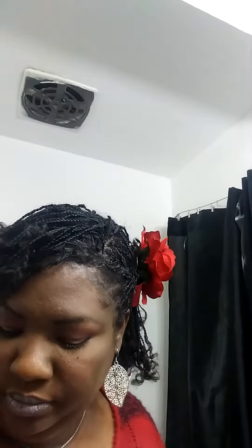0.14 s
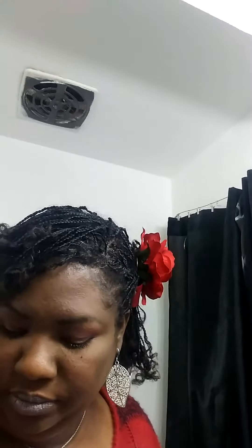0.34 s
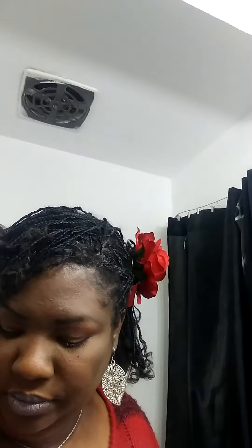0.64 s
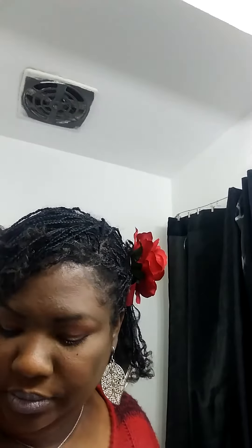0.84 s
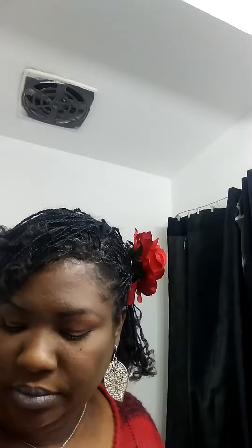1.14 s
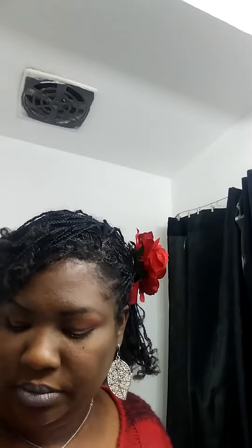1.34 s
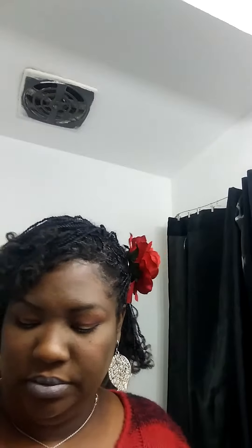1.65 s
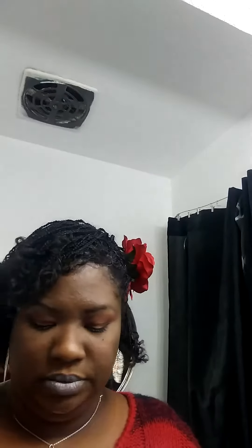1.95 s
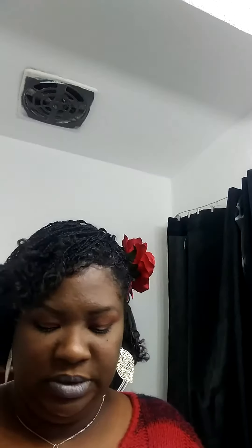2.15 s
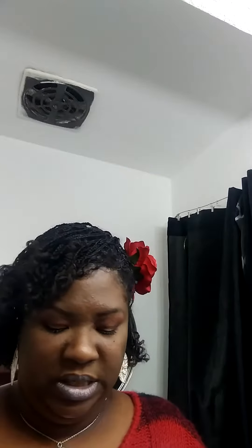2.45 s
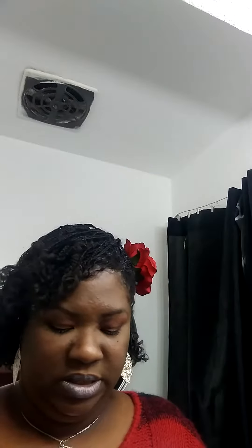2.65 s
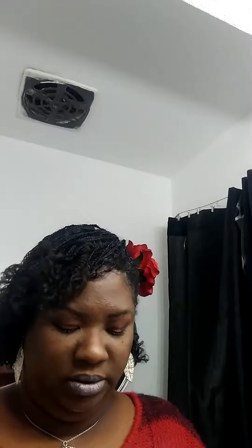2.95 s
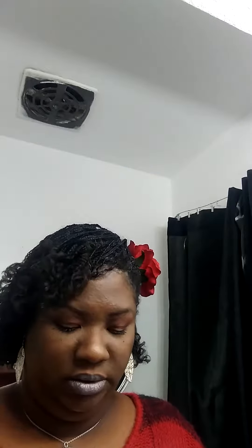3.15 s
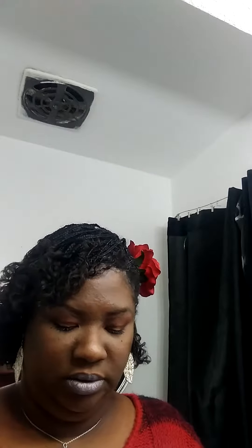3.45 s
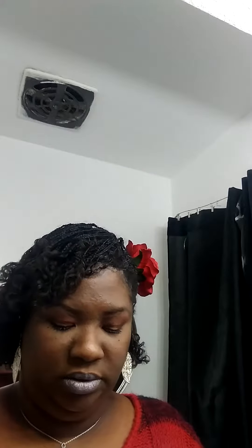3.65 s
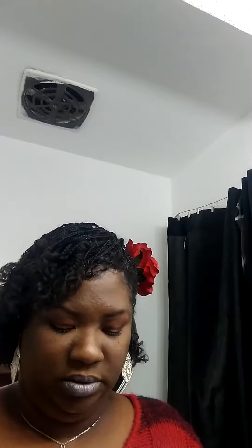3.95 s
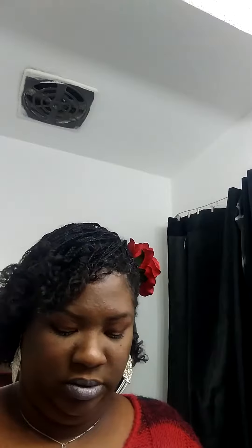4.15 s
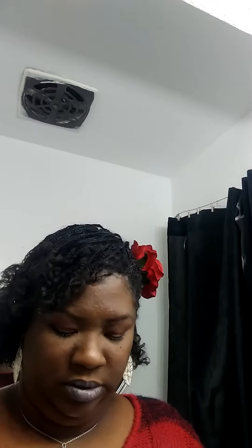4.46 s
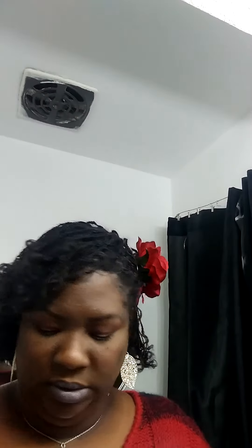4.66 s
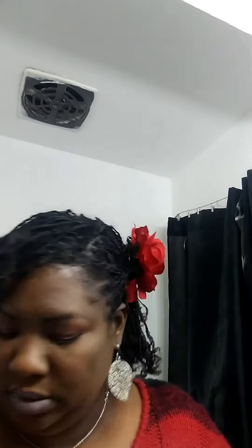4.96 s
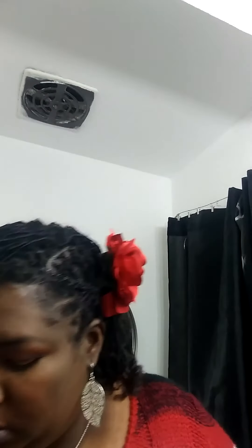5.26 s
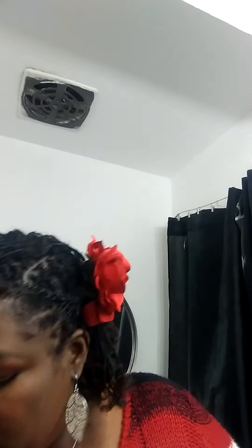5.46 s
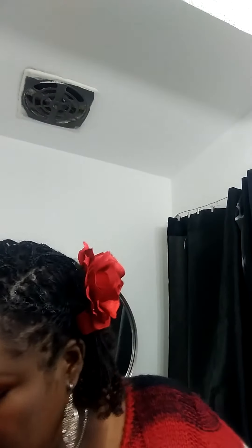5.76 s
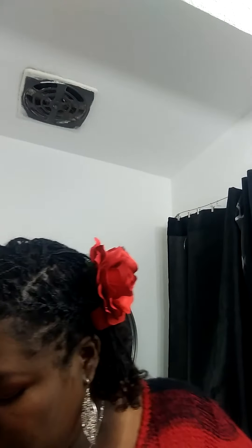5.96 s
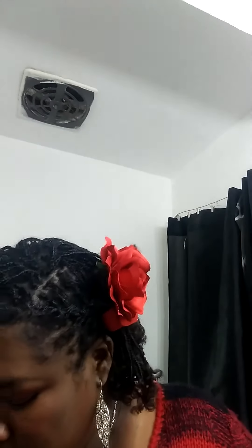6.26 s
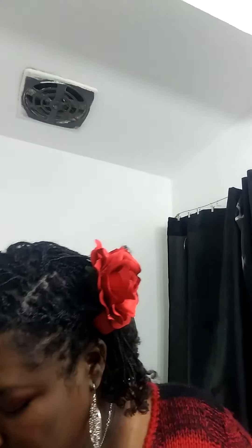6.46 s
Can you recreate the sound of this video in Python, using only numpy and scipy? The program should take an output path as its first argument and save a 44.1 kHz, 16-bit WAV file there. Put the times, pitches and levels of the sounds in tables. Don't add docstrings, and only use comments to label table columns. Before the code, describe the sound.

Very close to the microphone, a pouch rustles and crackles with small ticks and hollow knocks for about a second and a half. Sparse plastic taps follow, with a hard clack as a case is set down, then another sharp cluster later. Near the end the stand is bumped and slides with low rumbles and plastic scrapes. Faint air hiss in a small hard room.

```python
import sys
import numpy as np
from scipy import signal
from scipy.fft import rfft, irfft
from scipy.io import wavfile
from scipy.ndimage import uniform_filter1d, minimum_filter1d

SR = 44100
rng = np.random.default_rng(int(sys.argv[2]) if len(sys.argv) > 2 else 0)


def master(y):
    cut = np.clip(np.atleast_2d(y).T, -1, 1)
    pcm = np.round(cut * 32767)
    wavfile.write(sys.argv[1], SR, pcm.astype(np.int16))


def elevation(decibels):
    levels = np.asarray(decibels, float)
    return 10 ** (levels / 20)


N = 291677

# (top [s], rise per 20 dB [s], fall per 20 dB [s], fizz [dB], heft [dB])
POUCH = [(0.153, 0.32, 0.24, -29.5, -13), (0.265, 0.7, 0.1, -34.5, -14.5), (0.37, 0.23, 0.36, -34.5, -15),
         (.45, 0.23, 0.2, -33, -11), (0.527, 0.2, 0.08, -31.5, -8.5), (0.738, 0.5, 0.18, -37.5, -12.5),
         (0.923, 0.33, 0.17, -32, -11), (0.999, 0.13, 0.01, -34.5, -7.5), (1.035, 0.23, 0.01, -35.5, -7.5),
         (1.128, 0.4, 0.1359, -36.5, -9.5), (1.25, 0.35, 0.2, -39, -15.5), (1.32, 0.1, 0.05, -39, -11),
         (1.398, 1.2, 0, -42.5, -12.5), (1.54, 0.4, 0.5, -49, -13.5)]
# (top [s], rise per 20 dB [s], fall per 20 dB [s], fizz [dB], heft [dB])
DRAGS = [
    (5.358, 0.02, 0.077, -40, -6),
    (5.382, .05, 0.081, -45, -6.5),
    (6.25, 0.054, 0.046, -37, -6),
    (5.736, 0.013, 0.091, -51.5, 5),
    (6.038, 0.12, 0.062, -40.5, -1),
    (6.12, 0.16, 0.04, -56.5, 0),
    (6.179, 0.007, 0.12, -37.5, 3),
    (6.204, 0.038, 0.076, -35, -0.5),
    (6.323, 0.019, 0.099, -46, -21),
    (6.505, 0.003, 0.077, -55, -1.5),
]
# (middle [s], half length [s], fizz [dB], heft [dB])
SWIPES = [(2.542, 0.0097, -49, -3.5), (3.083, 0.016, -50, -12), (3.285, 0.031, -45.5, -12.5),
          (3.608, 0.022, -46, -18.5), (3.933, 0.023, -44.5, -14), (4.001, 0.007, -54.5, -13),
          (4.39, 0.17, -61.5, 1), (4.587, 0.016, -51.5, -9.5), (4.776, 0.019, -53, 0.5),
          (5.137, 0.015, -51, -26), (5.443, 0.034, -64, -1.5), (5.634, 0.034, -70.5, 10),
          (5.903, 0.032, -49.5, 3.5)]
# (time [s], fizz [dB])
FIDGET = [(1.49, -77), (1.62, -57), (1.75, -70), (1.93, -66), (2.1, -51.5), (2.33, -51.5), (2.48, -64),
          (2.72, -55.5), (3.0, -67.5), (3.2, -68.5), (3.56, -60), (3.99, -53.5), (4.14, -74), (4.55, -67),
          (4.63, -46.5), (5.02, -57), (5.5, -65.5), (6.62, -67)]
FIDGET_DB = [0, -71, -72.5]
FIDGET_LEAN = [1, 0.58, 0.65]
BODY_DB, BODY_LEAN = -3.5, 1.606

# (frequency [Hz], density [dB per Hz])
FIZZ = [(2650, -52), (4500, -20), (4850, -13), (5760, -15.5), (6730, -7), (7820, -3), (9140, -2),
        (10800, 3), (15000, -4.5), (16200, -21.5)]
SCRAPE = [(650, -15.5), (1100, -15), (1220, -5.5), (1720, -2.5), (1880, -2), (5590, 1.5), (7000, -4),
          (9100, -33), (15400, -120)]
BODY = [(110, -17), (180, -7.5), (383, -3.5), (446, -5), (867, -2.5), (978, -4.5), (2000, -10),
        (2600, -9.5), (4400, -120)]

# (frequency [Hz], density [dB per Hz])
HUSH = [(18, -30), (30, 3.5), (86, -2), (554, -15.5), (721, -9.5), (1220, -21.5), (1810, -16), (3770, -17),
        (4190, -8), (4530, -13.5), (7270, -20), (11100, -8), (13700, -12), (16000, -22)]
HUSH_DB = -61.5
# (frequency [Hz], width [Hz], level [dB])
PIPES = [
    (746, 430, -81),
    (1560, 90, -78),
    (2280, 90, -82.5),
]

# (time [s], snap [dB], shell against snap [dB], room answer [dB])
TICKS = [(.0085, -28, -18, -30), (.128, -28, -23, -19), (.265, -25.5, -25, -24), (.353, -26.5, -14, -22),
         (.4394, -35, -20, -17), (.5053, -30, -29, -20), (.711, -39, -22, -29), (0.867, -27, -37, -27),
         (.928, -23, -22, -16), (1.1254, -27, -24, -27), (1.2474, -31.5, -27, -9), (1.314, -33, -19, -10),
         (1.368, -36, -25, -23), (1.3955, -32.5, -25, -20), (1.4316, -46, -25, -25),
         (1.4499, -40, -20.5, -10), (1.5906, -42, -15.5, -9), (1.7065, -46, -17, -12),
         (1.818, -47.5, -30.5, -9), (1.8597, -47, -32, -5.5), (1.9255, -57, -28, -16),
         (2.3507, -28, -15, -28), (3.38, -53, -15, -29), (3.6985, -42, -37, -19),
         (3.917, -34.5, -25.5, -14), (4.242, -43, -26, -18), (5.871, -41, -14, -14),
         (6.117, -44.5, -26, -3)]
CAPS = [(1.52, -46, -19, -0.5), (1.669, -43.5, -17, -10), (1.7678, -43.5, -20, -6.5),
        (2.178, -30, -10.5, -12), (2.1849, -39, 1, -23), (2.357, -37, -28, -22), (2.36, -32, -13, -21),
        (2.3765, -4.5, -12, -21.5), (2.5365, -33, -23, -11.5), (2.833, -22.5, -16.5, -21),
        (3.343, -45, -24, -6), (3.5094, -32, -47, -16), (3.5185, -33, -51, -17), (3.5184, -20.5, -52, -20),
        (4.0166, -35.5, -37, -26), (4.043, -38.5, -13.5, -10), (4.0932, -19.5, -26.5, -16),
        (4.154, -6.5, -29.5, -19.5), (4.4477, -11.5, -14.5, -21), (4.453, -6, -16.5, -21),
        (4.5697, -36, -29.5, -12), (4.6057, -28, -20, -10.5), (4.6505, -18.5, -19, -19.5),
        (5.043, -33.5, -43, -13), (5.1967, -32.5, -27, -18), (5.3536, -34.5, -12.5, -7.5)]
CASES = [(1.639, -42.5, -20, -19), (2.0118, -39.5, -14.5, -11), (2.3017, -30.5, -16.5, -15),
         (2.349, -27, -5.5, -19.5), (2.374, -3.5, -15.5, -16), (2.3753, -8, -14.5, -20),
         (2.8847, -36.5, -12.5, -14), (2.9174, -42, -9.5, -11), (3.1966, -45.5, -17, -12.5),
         (3.3662, -33, -11.5, -16.5), (4.0495, -31.5, -12, -30), (4.2175, -35.5, -6.5, -17.5),
         (4.226, -35, -34, -12), (4.2938, -12.5, -28, -20), (4.3276, -34.5, -12, -13.5),
         (4.4565, -10.5, -17.5, -22), (4.7203, -18, -17.5, -18), (4.744, -19, -27, -16),
         (5.0879, -30, -15, -12.5), (6.1975, -27.5, -8, -3.5)]
TUBES = [(1.954, -33, -16.5, -14), (2.134, -41.5, -17, -16), (2.244, -34.5, -13, -8),
         (2.502, -42.5, -39, -5.5), (2.5911, -34.5, -16.5, -16.5), (2.6237, -36, -23.5, -13),
         (2.718, -42, -12, -17), (2.801, -43, -19.5, -13), (3.0058, -39, -13.5, -13.5),
         (3.013, -39.5, -10, -24), (3.4545, -44, -27.5, -4), (3.6814, -33, -38, -22),
         (3.6935, -31.5, -44, -24), (3.819, -32.5, -47.5, -13), (3.8293, -32.5, -18, -22),
         (3.874, -37.5, -16.5, -13), (4.263, -40, -28, -9.5), (4.499, -40.5, -0.5, -17.5),
         (4.6578, -22.5, -22, -16), (4.715, -33.5, -16, -25), (4.8274, -41, -18, -5.5),
         (5.7241, -50, 0, -5.5), (6.1757, -39, -5, -24.5), (6.3163, -40, -23, -8), (6.327, -35, -22, -12),
         (6.5035, -33.5, -28, -20)]
# (shell ring [Hz], thud under the shell [dB])
SHELLS = [
    (6530, -20),
    (2400, -5.5),
    (1700, -17.5),
    (4530, -23.5),
]
SNAP_EDGE = [5.5, 3.5, 2.5]

# (time [s], peak [dB], pitch [Hz], T60 [s])
THUDS = [(.432, -34, 150, 0.16), (.438, -39, 290, 0.11), (.438, -33.5, 606, 0.11), (.44, -39, 386.4, 0.37),
         (.52, -42.5, 170, .12), (.818, -36, 567, .09), (.84, -44, 92, 0.18), (.992, -37, 225, 0.11),
         (1.062, -38.5, 250, .1), (1.175, -41, 245, .1), (1.955, -44.5, 298, .08),
         (2.372, -32.5, 189, 0.094), (2.378, -23, 1618, .13), (2.378, -23.5, 2370, 0.1),
         (2.378, -32, 2760, .07), (2.63, -53, 750, .12), (2.92, -48, 640, .1), (3.19, -51, 518, 0.12),
         (3.37, -46, 1650, 0.086), (4.447, -46, 205, 0.11), (5.283, -43.5, 108, 0.28),
         (5.61, -45, 90.3, .3), (5.675, -33, 75, .3), (5.72, -32, 93, .25), (5.834, -25.5, 80, 0.26),
         (5.88, -25.5, 69.7, 0.26), (5.925, -30.5, 110, 0.23), (5.975, -30, 72, 0.28),
         (5.84, -33.5, 249.6, .3), (5.88, -32, 229, 0.26), (5.86, -34, 347, 0.31), (6.035, -31.5, 92, 0.28),
         (6.075, -34.5, 84.2, .25), (6.172, -29.5, 125, 0.14), (6.192, -29.5, 105, 0.18),
         (6.18, -29, 253.5, 0.32), (6.175, -33, 427, .2), (1.3, -51.5, 850, 0.14), (1.41, -54, 1290, 0.099),
         (3.05, -53, 327, 0.31), (4.78, -48, 1600, .15), (1.771, -61, 1625, 0.19)]
# (time [s], peak [dB], pitch [Hz], T60 [s], scuff [dB])
KNOCKS = [(0.436, -28, 891, 0.14, -28.5), (0.516, -41, 387, 0.17, -38.5), (0.706, -43, 611, 0.31, -48),
          (0.816, -32, 876, 0.092, -37.5), (0.989, -36, 650, 0.1, -36), (1.038, -33.5, 648, 0.12, -40.5),
          (1.128, -33, 1730, 0.14, -35.5), (1.145, -37, 2160, 0.13, -39), (1.155, -40, 626, 0.23, -46),
          (1.189, -35, 521, 0.12, -66), (2.377, -25, 1502, 0.22, -43.5), (3.315, -36, 615, 0.073, -49.5),
          (3.582, -43.5, 695, 0.07, -61.5), (3.615, -51.5, 835, 0.13, -56), (4.827, -44, 630, 0.09, -66),
          (5.11, -43, 1700, 0.073, -46), (5.43, -54.5, 830, 0.24, -63), (6.335, -46, 610, 0.14, -66),
          (6.005, -27, 359, 0.19, -39.5), (6.172, -23.5, 616, 0.19, -47), (6.175, -28, 944, 0.16, -53),
          (3.828, -43, 1005, 0.053, -50), (3.876, -43, 854, 0.095, -58), (3.93, -51, 844, 0.082, -60),
          (4.66, -41, 894, 0.1, -55), (4.72, -41, 942, 0.12, -58), (3.006, -41, 1100, 0.049, -58),
          (4.155, -44, 894, 0.081, -53), (2.252, -45, 558, 0.12, -44), (1.06, -36.5, 618, 0.075, -45)]
KNOCK_SPREAD, KNOCK_SIDE_DB = 0.07, -2
THUMP_DB = -1.5

# (top [s], rise per 20 dB [s], fall per 20 dB [s], rumble [dB])
JOLTS = [(0.44, 0.3, 0.5, -56.5), (0.85, -0.3, 0.7, -58), (0.99, 0.5, 0.8, -58.5), (1.35, 2, -0.5, -64),
         (1.8, 0.5, -3, -64), (2.37, -1.5, -0.5, -59), (2.95, -4, 1.5, -63), (4.46, 5, 5, -71),
         (5.3, 0.4, 1, -55), (5.735, 0.12, 0.53, -41), (5.85, 0, -0.2, -34), (6.04, 0.21, -0.28, -35),
         (6.19, -0.06, -0.13, -31), (6.42, -2, 2.5, -62.5)]
STAND_DB = -69
# (frequency [Hz], density [dB per Hz])
RUMBLE = [(21, -31.5), (38, 4), (65, 2.5), (95, -0.5), (155, -4), (193, -9), (264, -12), (346, -16),
          (475, -17.5), (680, -28.5), (1140, -120)]
# (top [s], rise per 20 dB [s], fall per 20 dB [s], level [dB])
SHOVES = [
    (5.845, 0.11, 0.8, -41.5),
    (5.91, 0.2, 0.54, -43),
    (6.02, 0.2242, 0.17, -33.5),
    (6.18, 0.02, 0.29, -37),
    (5.72, 0.34, 3, -62),
]
# (frequency [Hz], width [Hz], level [dB])
PLATE = [
    (72, 25, -0.5),
    (254.5, 60, -4.5),
    (360, 55, -7),
    (605, 230, -26),
]

# (frequency [Hz], left-right coherence [0-1])
SAME = [(60, .97), (200, .93), (350, .85), (600, .3), (900, .1), (15000, .0)]
BASS_TURN = 2.85
# (frequency [Hz], left over right [dB])
LEFT_BRIGHTER = [(60, -2.5), (240, 0.5), (950, 5.5), (3800, 3.5), (6000, 12), (8000, 13.5), (11000, 26),
                 (13000, 14), (15500, 18.5)]

# (frequency [Hz], against the local band [dB], against the
# loudest band [dB])
LOSS = [(500, -22, -60), (1400, -12, -50), (2600, -1, -28), (8000, 0, -25), (9500, -9, -36),
        (11500, -11, -36), (14000, -6, -36), (15500, -3, -30)]
STARVED_HZ = [2000, 2850, 3850, 4600, 5400, 6300, 7150, 7750]
EDGE_HZ, GRID = 15800, 401
TOP_DB, TOP_DB_PER_KHZ = -33, 5
BURIED_DB = -54


def read(points, hz):
    f, value = np.transpose(points)
    return np.interp(np.log(hz + 1), np.log(f + 1), value)


def add(mix, s, sound):
    part = mix[..., round(s * SR):][..., :sound.shape[-1]]
    part += sound[..., :part.shape[-1]]


def taps_of(points, size=16384):
    gain_db = read(points, abs(np.fft.fftfreq(size, 1 / SR)))
    log_gain = np.log(elevation(np.maximum(gain_db, -70)))
    return np.fft.ifft(np.exp(np.conj(signal.hilbert(log_gain)))).real[:size // 2]


def coloured(x, points):
    taps = taps_of(points)
    return signal.oaconvolve(x, taps[None] / np.linalg.norm(taps), axes=1)[:, :N]


def resonate(x, hz, q):
    return signal.lfilter(*signal.iirpeak(hz, q, fs=SR), x)


def flicker(size, db):
    wander = uniform_filter1d(uniform_filter1d(rng.standard_normal(N), size), size)
    gain = elevation(db * wander / wander.std())
    return gain / np.sqrt(np.mean(gain ** 2))


def coarse_times():
    return np.arange(N // 32 + 1) * 32 / SR


def spread_out(gain):
    return np.interp(np.arange(N) / 32, np.arange(len(gain)), gain)


def strokes(rows):
    top, rise, fall, db = np.transpose(rows)[:4, :, None]
    late = coarse_times() - top
    return elevation(db - 20 * np.maximum(late / abs(fall), -late / abs(rise)))


def rub_gains():
    t = coarse_times()
    middle, half, db, _ = np.transpose(SWIPES)[..., None]
    swipes = elevation(db) * np.exp(-((t - middle) / half) ** 2 / 2)
    shapes = np.vstack([strokes(POUCH + DRAGS), swipes])
    heft_db = np.array([row[-1] for row in POUCH + DRAGS + SWIPES])
    band_db = np.array([0 * heft_db, heft_db, BODY_DB + BODY_LEAN * heft_db])
    power = elevation(2 * band_db) @ shapes ** 2
    fidget_db = np.interp(t, *np.transpose(FIDGET))
    gains = []
    for k, (level_db, lean) in enumerate(zip(FIDGET_DB, FIDGET_LEAN)):
        above_db = fidget_db + 60 * (k > 0)
        bed = elevation(level_db + lean * above_db)
        gains.append(spread_out(np.sqrt(power[k] + bed ** 2)))
    return np.array(gains)


def rubbing():
    gains = rub_gains()
    slips = np.array([flicker(size=600, db=1.3) * flicker(size=30, db=1.7) for band in gains])
    crackle = elevation(4.0 * np.minimum(rng.exponential(1, N), 3))
    crackle = crackle * (rng.random(N) < 350 / SR)
    grain = rng.standard_normal((3, 2, N)) + 1.1 * crackle * rng.standard_normal((2, N))
    band_gain = elevation(np.array([6, 4, 4]))[:, None]
    return (gains * slips * band_gain)[:, None] * grain


def hush():
    air = rng.standard_normal((2, N))
    bands = sum(elevation(db) * np.sqrt(SR / width) * resonate(air, hz, hz / width) for hz, width, db in PIPES)
    steady = elevation(HUSH_DB) * coloured(air, HUSH) * flicker(size=6000, db=1.5)
    return steady + bands * flicker(size=3000, db=5.0)


def contacts():
    events = []
    for rows, (hz, thud_db) in zip([CAPS, TUBES, CASES, TICKS], SHELLS):
        for s, snap_db, heft_db, room_db in rows:
            shell_db = snap_db + heft_db
            events.append((s, snap_db, shell_db, shell_db + thud_db, room_db, hz))
    return events


def clicks():
    t, drive = np.arange(7000) / SR, np.zeros((3, 2, N))
    contact_t60 = np.array([0.003, 0.008, 0.011])[:, None, None]
    room_t60 = np.array([0.16, 0.19, 0.21])[:, None, None]
    band_db, wet_db = np.array([2, 12, 10]), np.array([4, 6, 8])[:, None, None]
    far = elevation([[0], [-3]])
    for s, snap_db, shell_db, thud_db, room_db, hz in contacts():
        noise, echoes = rng.standard_normal((3, 2, len(t))), rng.standard_normal((2, len(t)))
        peaks = np.clip(uniform_filter1d(echoes, size=9) * 3, -2, 2) - 0.11
        sparse = elevation(5 * np.exp(-t / 0.061) * peaks)
        onset = 1 - np.exp(-t / 0.00043)
        tail = elevation(room_db + wet_db - 60 * t / room_t60) * onset * sparse
        sound = (elevation(-60 * t / contact_t60) * far + tail) * noise
        sound[0][:, [0, 4, 30]] += far * SNAP_EDGE
        sound[0] = 0.48 * sound[0] + 1.005 * resonate(sound[0], 11300, 5.0)
        own_hz = hz * elevation(1.5 * echoes[0, 0])
        sound[1] = 0.5 * sound[1] + 0.73 * resonate(sound[1], own_hz, 7.0)
        level = elevation(np.array([snap_db, shell_db, thud_db]) + band_db)[:, None, None]
        add(drive, s + 0.0004, level * sound)
    return drive


def knocks():
    t, out = np.arange(12000) / SR, np.zeros((2, N))
    main = (np.arange(7) == 0)[:, None]
    weight = np.where(main, 1, elevation(KNOCK_SIDE_DB) / 2)
    for s, peak_db, hz, t60, *_ in KNOCKS + THUDS:
        spread, phase = rng.standard_normal((2, 2, 7, 1))
        mode_hz = hz * (1 + KNOCK_SPREAD * spread * ~main)
        ring = (weight * np.sin(2 * np.pi * (mode_hz * t + phase))).sum(1)
        rattle = 1 + 0.35 * uniform_filter1d(rng.standard_normal(len(t)), size=400) * 20
        decay = elevation(peak_db - 2.5 - 60 * t / max(t60, 0.01))
        add(out, s, decay * rattle * (1 - np.exp(-t * hz / 0.6)) * ring)
    return out


def scuffs():
    t, drive = np.arange(12000) / SR, np.zeros((3, 2, N))
    for s, _, _, t60, scuff_db in KNOCKS:
        shape = elevation(1.5 - 60 * t / max(1.15 * t60, 0.01)) * (1 - np.exp(-t / 0.0022))
        level = elevation([scuff_db, scuff_db + THUMP_DB])[:, None, None]
        add(drive[1:], s, level * shape * rng.standard_normal((2, 2, len(t))))
    return drive


def stand():
    shake = spread_out(np.sqrt((strokes(JOLTS) ** 2).sum(0) + elevation(2 * STAND_DB)))
    push = elevation(6.0) * shake * flicker(size=900, db=1.5)
    slide = spread_out(np.sqrt((strokes(SHOVES) ** 2).sum(0))) * rng.standard_normal((2, N))
    drum = sum(elevation(db) * np.sqrt(SR / width / 3) * resonate(slide, hz, hz / width) for hz, width, db in PLATE)
    return coloured(push * rng.standard_normal((2, N)), RUMBLE) + drum


def scene():
    fizz, scrape, body = rubbing() + clicks() + scuffs()
    plastic = coloured(fizz, FIZZ) + coloured(scrape, SCRAPE) + coloured(body, BODY)
    return plastic + hush() + knocks() + stand()


def framed(x, size):
    n, k, grid = np.arange(2 * size) + 0.5, np.arange(size) + 0.5, GRID % size
    window = np.sin(np.pi * n / (2 * size))[:, None]
    basis = np.sqrt(2 / size) * window * np.cos(np.pi / size * np.outer(n + size / 2, k))
    padded = np.pad(x, ((0, 0), (size - grid, 2 * size - (N - grid) % size))).reshape(2, -1, size)
    return np.concatenate([padded[:, :-1], padded[:, 1:]], axis=2), basis, k * SR / (2 * size)


def lapped(back):
    size = back.shape[2] // 2
    first = np.pad(back[..., :size], ((0, 0), (0, 1), (0, 0)))
    second = np.pad(back[..., size:], ((0, 0), (1, 0), (0, 0)))
    return (first + second).reshape(2, -1)[:, size - GRID % size:][:, :N]


def clipped_short(x, snappy, size=128):
    frames, basis, hz = framed(x, size)
    lines = frames @ basis
    snappy = np.repeat(snappy.any(0, keepdims=True), 8, axis=1)[:, 3:][:, :lines.shape[1]]
    band = uniform_filter1d(uniform_filter1d(lines ** 2, size=5), size=2, axis=1)
    loudest = band[..., hz > 1500].max((0, 2), keepdims=True)
    snap = -minimum_filter1d(-loudest, size=9, axis=1)
    loss_hz, _, loss_db = np.transpose(LOSS)
    under_db = np.interp(hz, loss_hz, loss_db)
    luck = uniform_filter1d(rng.standard_normal(band[:1].shape), size=6)
    luck = uniform_filter1d(luck, size=3, axis=1) * np.sqrt(18)
    band = band * elevation(2 * 6 * luck)
    under_loudest = band < elevation(2 * under_db - 1) * loudest
    under_snap = (band < elevation(2 * BURIED_DB) * snap) & (hz > 1500)
    return lapped((lines * ~((under_loudest | under_snap) & snappy)) @ basis.T)


def patchy(x, size=1024):
    frames, basis, hz = framed(x, size)
    lines = frames @ basis
    loss_hz, *loss_db = np.transpose(LOSS)
    dead_db, under_db = (np.interp(hz, loss_hz, db) for db in loss_db)
    band = uniform_filter1d(lines ** 2, size=16)
    wide = uniform_filter1d(band, size=60)
    far_under = band < elevation(2 * under_db) * wide[..., hz > 1500].max(2, keepdims=True)
    top_db = TOP_DB + TOP_DB_PER_KHZ * (hz - EDGE_HZ) / 1000
    faint = wide < elevation(2 * top_db) * band.max((0, 2), keepdims=True)
    patches = rng.standard_normal((1, frames.shape[1], size // 8))
    patches = uniform_filter1d(patches, size=5, axis=1) * np.sqrt(5)
    patches = np.repeat(patches, 8, axis=2)
    patches = patches + 1.6 * sum(np.exp(-((hz - f) / 70) ** 2) for f in STARVED_HZ)
    right_db = np.where(hz > 6500, -3, dead_db)
    dead_db = np.array([dead_db, right_db])[:, None]
    weak = lines ** 2 < band * elevation(2 * np.minimum(dead_db + 2 + 5.5 * patches, 9))
    steady = abs(frames).max(2, keepdims=True) < 7 * frames.std(2, keepdims=True)
    lost = (far_under | weak | faint | (hz > EDGE_HZ)) & steady
    return clipped_short(lapped((lines * ~lost) @ basis.T), ~steady)


def band_limit(x):
    return signal.sosfilt(signal.butter(12, 16370, fs=SR, output="sos"), x)


def record(dry):
    size = 2 ** 19
    left, own = rfft(dry, size)
    same = np.clip(read(SAME, np.fft.rfftfreq(size, 1 / SR)), -0.98, 0.98)
    right = irfft(same * np.exp(1j * BASS_TURN) * left + np.sqrt(1 - same ** 2) * own)[:N]
    dulled = signal.oaconvolve(right, taps_of([(hz, -db) for hz, db in LEFT_BRIGHTER]))[:N]
    hiss = elevation(-74.5) * rng.standard_normal((2, N))
    bass_cut = signal.butter(4, 42, "high", fs=SR, output="sos")
    ports = signal.sosfilt(bass_cut, [dry[0], dulled] + hiss)
    mix = patchy(np.clip(ports, -1, 1))
    return band_limit(mix)


dry = scene()
out = record(dry)
master(out)
```